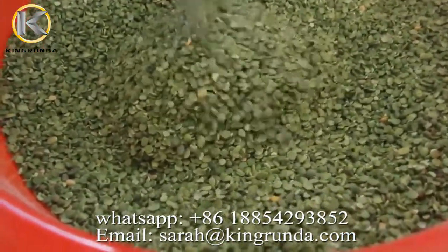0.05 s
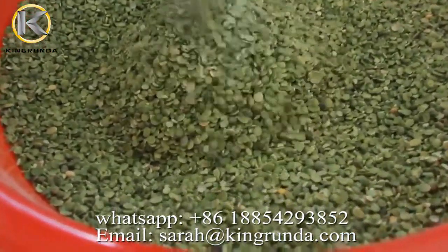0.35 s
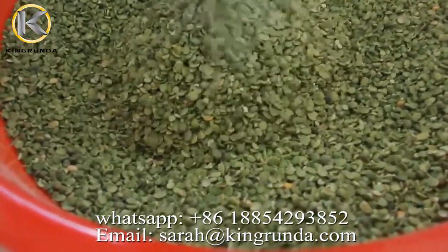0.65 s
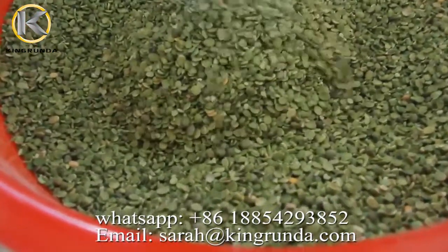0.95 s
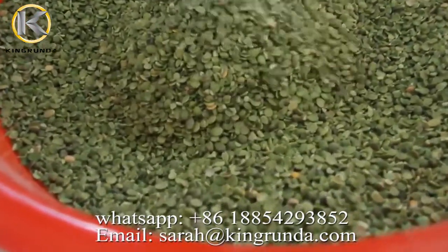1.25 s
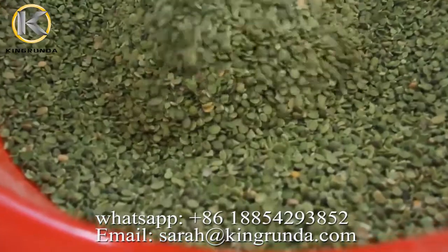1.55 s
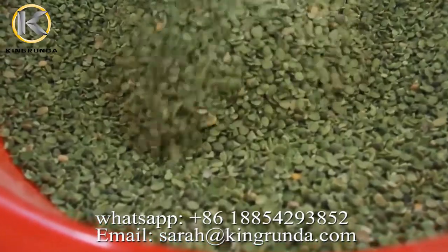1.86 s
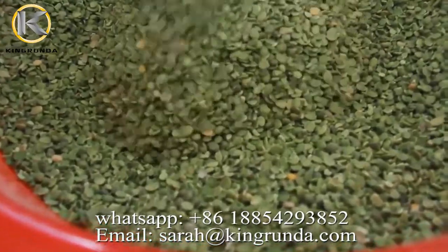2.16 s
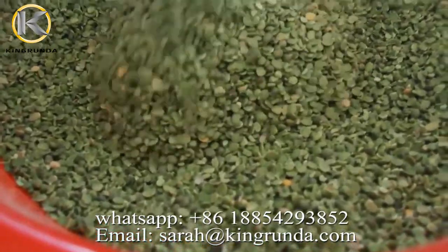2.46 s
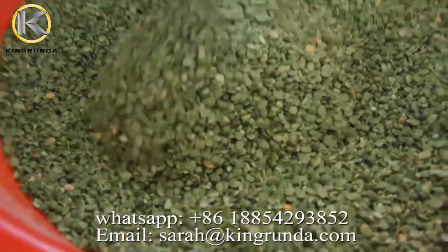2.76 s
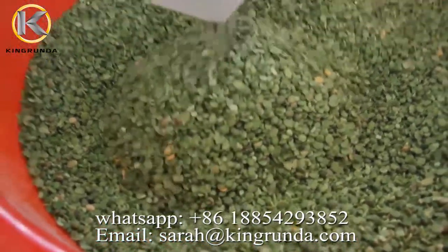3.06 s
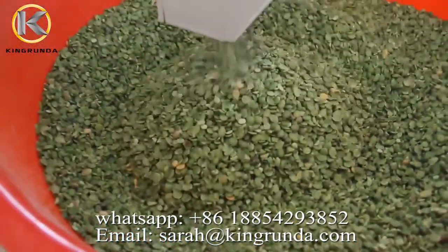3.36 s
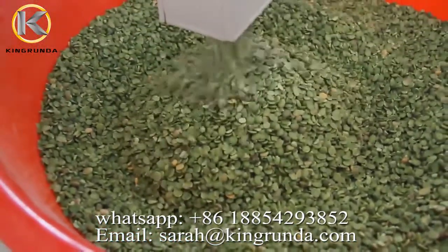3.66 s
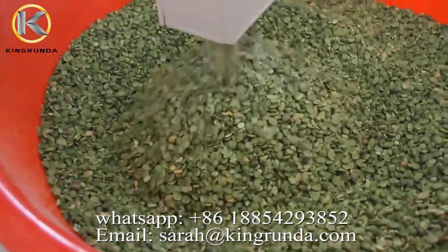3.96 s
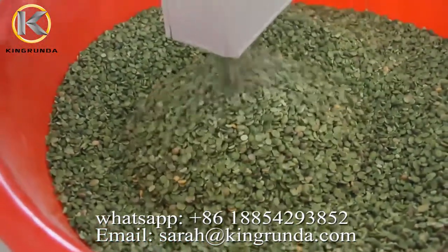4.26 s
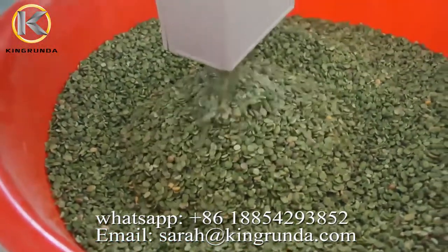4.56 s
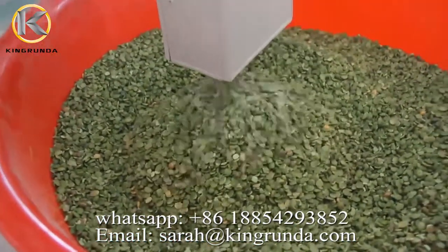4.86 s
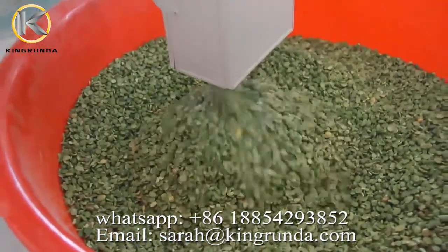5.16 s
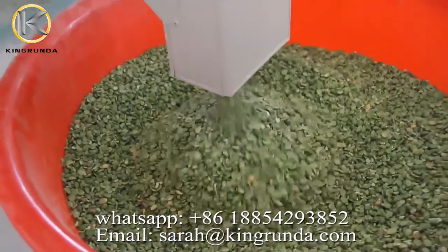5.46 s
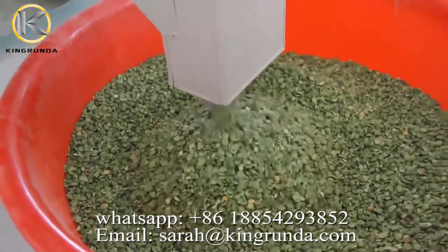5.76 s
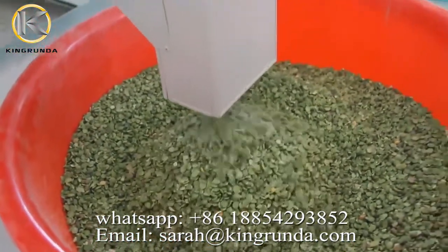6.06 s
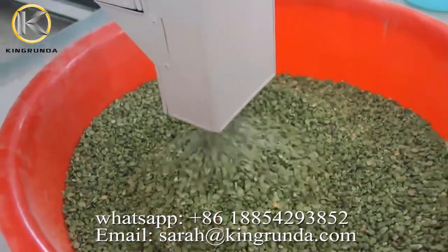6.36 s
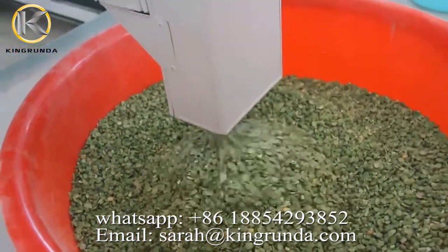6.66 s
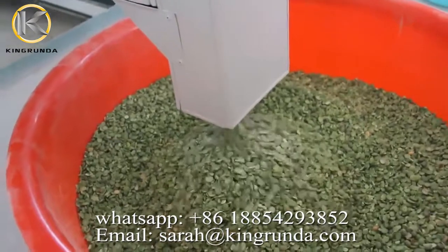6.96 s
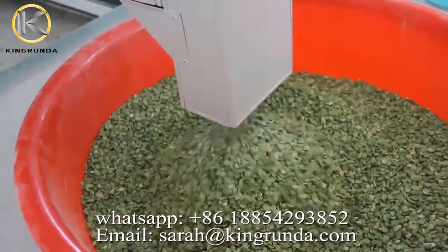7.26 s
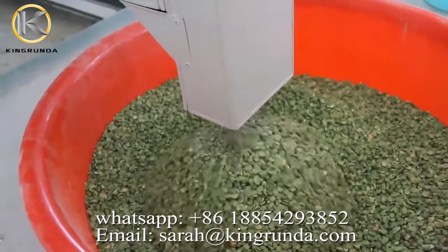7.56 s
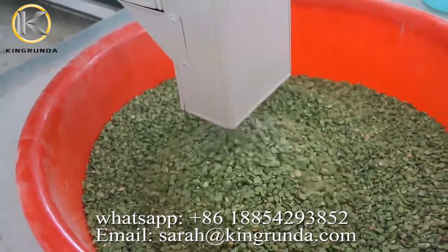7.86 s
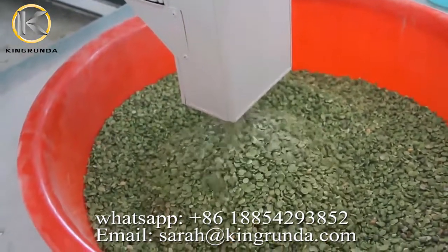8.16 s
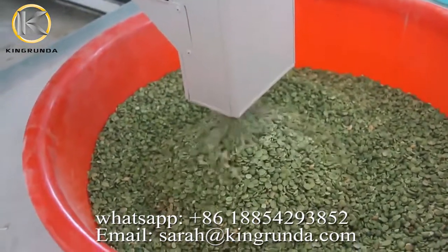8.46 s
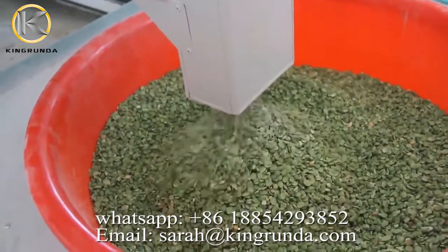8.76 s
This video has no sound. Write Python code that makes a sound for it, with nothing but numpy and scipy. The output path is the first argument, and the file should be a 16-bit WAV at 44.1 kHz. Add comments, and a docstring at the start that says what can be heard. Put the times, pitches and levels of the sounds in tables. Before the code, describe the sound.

A dense, dry hiss of peas pouring onto more peas is heard from just above a tub, mixed with the thin, high ring of the steel chute they slide down. Underneath, the peeling machine keeps up a metallic drum rattle and a faint rumble of blown air. The flow stays loud and even throughout, easing a little and shifting in tone as the microphone slowly moves back.

```python
"""Beside a running pea peeling machine, one microphone just above the tub that it fills.
Peas hiss onto the heap and skitter down a ringing sheet-metal chute; behind them more peas
rattle round the steel drum and a blower rumbles in its duct. The microphone edges in over
the heap, then from about three seconds draws back to face the side of the chute."""
import sys
import numpy as np
from scipy import signal
from scipy.fft import rfft, irfft
from scipy.io import wavfile

SR = 44100
rng = np.random.default_rng(int(sys.argv[2]) if len(sys.argv) > 2 else 0)


def dump_mix(stems):
    """Bounce the given channels to the path in sys.argv[1] as a 16-bit WAV at rate SR."""
    frames = np.atleast_2d(stems).T  # one column per channel
    limited = np.clip(frames, -1, 1)  # hard clip at full scale
    pcm = np.round(limited * 32767).astype(np.int16)
    wavfile.write(sys.argv[1], SR, pcm)


N = 392490
TIME = np.arange(N) / SR
HZ = np.fft.rfftfreq(16384, 1 / SR)

# the microphone's path: (time [s], distance [0 close over the heap, 1 drawn back])
MIC_PATH = [(0, 0.17), (2.8, 0.017), (3.4, 0.36), (5.3, 0.62), (6.5, 0.78), (8.9, 0.97)]


def pea_stream():
    """One flow runs down the chute onto the heap; the hiss holds up until the microphone is well back."""
    chute_lift_db, heap_lift_db = gushes()
    distance = curve(MIC_PATH)
    # the chute's mouth beams its ring at the heap; the microphone leaves the beam at distance 0.35
    off_beam = np.minimum((distance / .35) ** 2, 1)
    sliding = gain_of(-16.5 - 3.3 * off_beam + chute_lift_db) * chute()
    hiss = tub_echoes(heap(), echo_db=-14.5, spread_s=.016, count=10)
    landing = gain_of(-14 - 2 * distance ** 2 + heap_lift_db) * hiss
    return sliding + landing


def heap():
    """Peas land on peas: thousands of dry ticks a second merge into a hiss."""
    # spectrum of the landings: (frequency [Hz], level close [dB], level drawn back [dB])
    hiss_spectrum = [(400, -35.5, -29), (1400, -8.5, -11), (2460, -4, 1.5), (3260, 1, 3.5), (5000, 1, 1),
                     (5700, 1, 0.5), (7300, 0, 0.5), (8600, -2, 0.5), (10400, -4.5, -1.3),
                     (11600, -7.5, -1.4), (12700, -7, -6.5), (14000, -11, -9), (15900, -19.5, -15)]
    hz, close_db, back_db = np.transpose(hiss_spectrum)
    ticks = impacts(per_s=20000, spread_db=2) * feed(throb=.035, clump_db=.45, clump_hz=36)
    ticks = flutter(ticks, depth_db=.86, patch_hz=900, patch_s=.011)
    return at_microphone(ticks, slope_power(np.c_[hz, close_db]), slope_power(np.c_[hz, back_db]))


def flutter(x, depth_db, patch_hz, patch_s):
    """Clumps land on changing parts of the heap, so patches of the spectrum brighten and fade."""
    hz, seconds, spectrum = signal.stft(x, SR, nperseg=256)
    patches = rng.standard_normal(spectrum.T.shape).T
    # smooth across frequency, then along time
    for axis, memory in enumerate([np.exp(-hz[1] / patch_hz), np.exp(-seconds[1] / patch_s)]):
        patches = signal.lfilter([1 - memory], [1, -memory], patches, axis=axis)
    spectrum = spectrum * gain_of(depth_db * unit_rms(patches))
    return unit_rms(signal.istft(spectrum, SR, nperseg=256)[1][:N])


def tub_echoes(x, echo_db, spread_s, count):
    """Faint echoes off the tub wall and the machine comb the sound, shifting as the microphone moves."""
    distance, sample = curve(MIC_PATH), np.arange(N)
    echoes = np.zeros(N)
    for path, shift, sign in rng.random((count, 3)):
        delay_s = spread_s * (.1 + path) + .0005 * (shift - .5) * distance
        echoes += np.sign(sign - .5) * np.interp((sample - delay_s * SR) % N, sample, x)
    return (x + gain_of(echo_db) * echoes / np.sqrt(count)) / np.hypot(1, gain_of(echo_db))


def chute():
    """Peas skitter down the thin steel chute and ring its modes."""
    # chute modes: (frequency [Hz], width [Hz], level close [dB], level drawn back [dB])
    chute_modes = [(3170, 240, -12, -6), (3460, 140, -9.5, 3), (3623, 116, 1.5, -8), (3754, 104, 2.5, 1.5),
                   (4010, 83, 0.5, 2), (4170, 120, -2.5, -10), (4350, 100, 0, -2.5), (4510, 140, -2.5, -7),
                   (4750, 94, 0.5, 2.5), (4970, 160, -19, -2), (5234, 86, -3, 1), (5780, 76, -15, -5),
                   (6530, 80, -22, -10)]
    blows = impacts(per_s=4000, spread_db=2) * feed(throb=.055, clump_db=.64, clump_hz=20)
    return metal_body(blows, chute_modes)


def gushes():
    """Each gush swells and ebbs smoothly: the dB added to the chute and to the heap."""
    # thicker gushes of peas: (middle [s], length [s], chute change [dB], heap change [dB])
    pea_gushes = [(.55, .7, .3, .5), (1.35, .6, 0.5, 0.3), (2.9, .3, -1, 1), (4.65, .2, -2, 0.5),
                  (6.3, .2, .3, .7), (6.85, .15, 1.5, 0.5), (7.27, .3, 1.8, 0.5), (8.05, 0.26, 3.5, 0.5)]
    chute_lift_db, heap_lift_db = np.zeros((2, N))
    for middle, length, ring_db, hiss_db in pea_gushes:
        swell = np.cos(np.pi * np.clip((TIME - middle) / length, -.5, .5)) ** 2
        chute_lift_db += ring_db * swell
        heap_lift_db += hiss_db * swell
    return chute_lift_db, heap_lift_db


def drum():
    """Behind the stream, a swarm of blows sets the steel drum and its panels ringing."""
    # low drum modes: (frequency [Hz], width [Hz], level close [dB], level drawn back [dB])
    low_modes = [(730, 16, -19, -9), (777.7, 28, 3, 0), (835, 21, -3, 0), (910, 20, -3, -8),
                 (950, 15, -9, -16)]
    # high panel modes: (frequency [Hz], width [Hz], level close [dB], level drawn back [dB])
    panel_modes = [(1070, 42, -1, 0.5), (1143, 30, -3, -6), (1353, 30, -4, 2.5), (1467, 38, -1, 1),
                   (1830, 32, 4, 2.5), (1937, 30, 2, 4), (2028, 15, 9, 7), (2195, 54, 1, 6),
                   (2420, 64, 0, 3.5), (2750, 50, 0, -6)]
    # spectrum of peas scoured in the drum: (frequency [Hz], level [dB])
    scour_spectrum = [(150, -30), (400, -12), (700, -6.5), (1000, -4), (1350, -1.5), (1700, -1), (2200, -1),
                      (2800, -3), (4000, -11), (8000, -34)]
    # the load in the drum lifts its low ring: (time [s], level [dB])
    load_swell = [(0, 1.5), (.8, 0), (1.2, -2.4), (1.7, -1), (2.27, 2), (2.6, -.8), (4.7, 0.2), (6.1, 1),
                  (7.0, -.2), (8.9, -.2)]
    load_db = curve(load_swell)
    blows = impacts(per_s=9000, spread_db=2.5) * feed(throb=.03, clump_db=.75, clump_hz=14)
    scouring = impacts(per_s=14000, spread_db=2) * feed(throb=.03, clump_db=.5, clump_hz=18)
    low_ring = falloff(close_db=-28, drop_db=9.5) * metal_body(blows, low_modes)
    panels = metal_body(scouring, panel_modes, slope_power(scour_spectrum))
    rattle = falloff(close_db=-20.5, drop_db=3.5) * panels
    return gain_of(load_db) * low_ring + gain_of(.18 * load_db) * rattle


def blower():
    """Under everything, turbulent air booms in the blower's duct."""
    # spectrum of the rushing air: (frequency [Hz], level [dB])
    air_spectrum = [(15, -26), (35, -34), (55, -11.5), (100, -4), (170, -2), (300, 0.5), (430, -3),
                    (600, -5), (900, -7.5), (2000, -43)]
    # duct and cover modes: (frequency [Hz], width [Hz], level close [dB], level drawn back [dB])
    duct_modes = [(127.6, 20, 1.5, 2), (201, 13, 3, -2), (243.5, 12, 4.5, 6.5), (257, 13, 3.5, 9.5),
                  (325, 25, 4, 7), (393, 16, 6, -8), (437, 14, -8, 1)]
    rumble = metal_body(rng.standard_normal(N), duct_modes, slope_power(air_spectrum))
    return falloff(close_db=-31.5, drop_db=3) * rumble


def impacts(per_s, spread_db):
    """Random blows of peas, most of them light and a few hard."""
    size = gain_of(spread_db * np.minimum(rng.exponential(1, N), 4))
    return size * rng.choice([-1, 1], N) * (rng.random(N) < per_s / SR)


def feed(throb, clump_db, clump_hz, rotor_hz=42.81):
    """Flow of peas: the rotor shakes it once a turn, and it comes in loose clumps."""
    shake = 1 + throb * np.sin(2 * np.pi * rotor_hz * TIME)
    smoothing = 1 + (np.fft.rfftfreq(N, 1 / SR) / clump_hz) ** 2
    clumps = unit_rms(irfft(rfft(rng.standard_normal(N)) / smoothing, N))
    return shake * gain_of(clump_db * clumps)


def metal_body(drive, modes, broad_power=0):
    """A driven metal body: damped modes over a broad spectrum, heard from the moving microphone."""
    close_power = back_power = broad_power
    for hz, width, close_db, back_db in modes:
        peak = (HZ * width) ** 2 / ((HZ ** 2 - hz ** 2) ** 2 + (HZ * width) ** 2)
        close_power = close_power + gain_of(close_db) ** 2 * peak
        back_power = back_power + gain_of(back_db) ** 2 * peak
    return at_microphone(drive, close_power, back_power)


def at_microphone(drive, close_power, back_power):
    """A source's colour changes with the microphone's distance; the result has unit rms."""
    distance = curve(MIC_PATH)
    return unit_rms((1 - distance) * ring(drive, close_power) + distance * ring(drive, back_power))


def falloff(close_db, drop_db):
    """Gain of a source that fades as the microphone draws back."""
    return gain_of(close_db - drop_db * curve(MIC_PATH))


def ring(drive, power):
    """A body with this power spectrum rings only after each blow (minimum phase)."""
    log_gain = np.log(power / power.max() + 1e-10) / 2
    mirrored = np.concatenate([log_gain, log_gain[-2:0:-1]])
    response = np.fft.ifft(np.exp(np.conj(signal.hilbert(mirrored)))).real
    running = np.concatenate([drive[-len(response) + 1:], drive])  # the machine is already under way
    return unit_rms(signal.oaconvolve(running, response, "valid"))


def slope_power(points):
    """Power spectrum through (frequency [Hz], level [dB]) points."""
    hz, db = np.transpose(points)
    return gain_of(np.interp(np.log(HZ + 1), np.log(hz), db)) ** 2


def curve(points):
    """Straight lines through (time [s], value) points."""
    return np.interp(TIME, *np.transpose(points))


def gain_of(db):
    """Decibels to amplitude."""
    return 10 ** (np.asarray(db) / 20)


def unit_rms(x):
    """Scales to an rms of one."""
    return x / np.sqrt(np.mean(x ** 2) + 1e-20)


def scene():
    """Heap, chute, drum and blower reach one microphone, the same in both channels."""
    machine = blower() + drum()
    return np.tile(machine + pea_stream(), (2, 1))


def record(dry):
    """The loud machine softly overloads the recorder; a low cut and a steep band limit follow."""
    ceiling, low_cut_hz, band_edge_hz = .67, 36, 15780
    rounded = ceiling * np.tanh(dry / ceiling)
    cut = signal.sosfilt(signal.butter(2, low_cut_hz, "high", fs=SR, output="sos"), rounded)
    band_limit = signal.firwin(1023, band_edge_hz, window=("kaiser", 9), fs=SR)
    return signal.oaconvolve(cut, band_limit[None], "same")


dry = scene()
out = record(dry)
dump_mix(out)
```